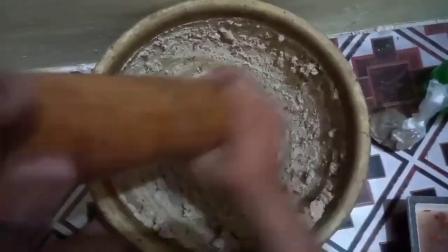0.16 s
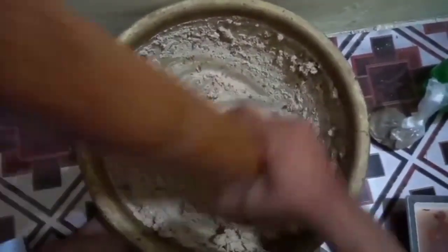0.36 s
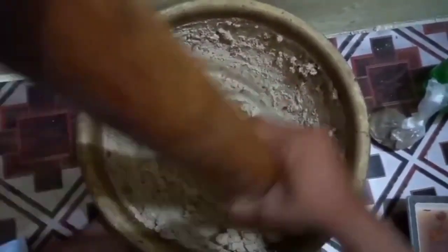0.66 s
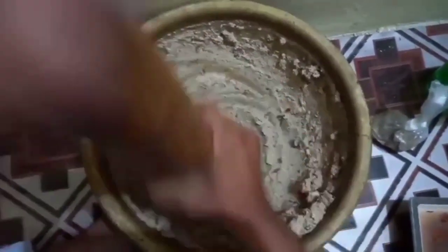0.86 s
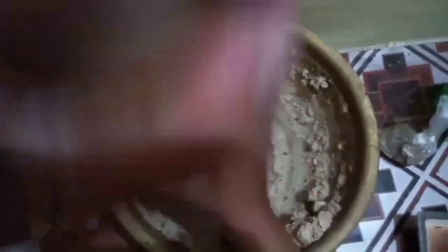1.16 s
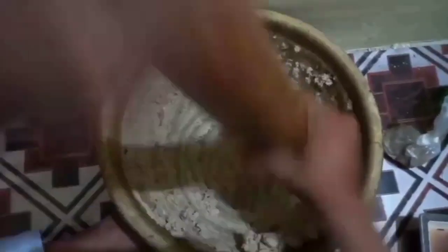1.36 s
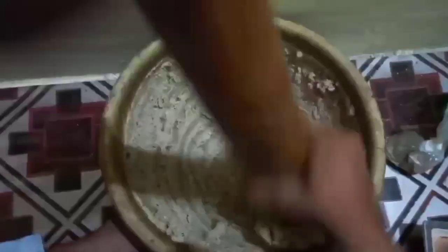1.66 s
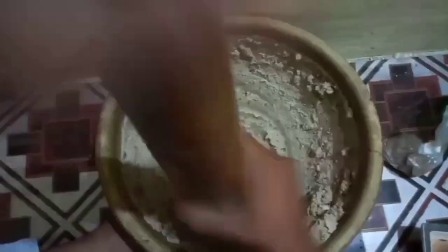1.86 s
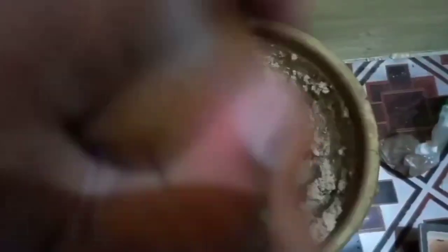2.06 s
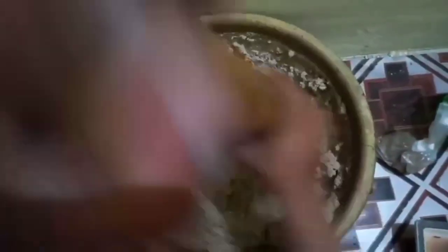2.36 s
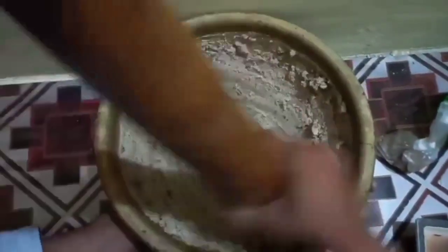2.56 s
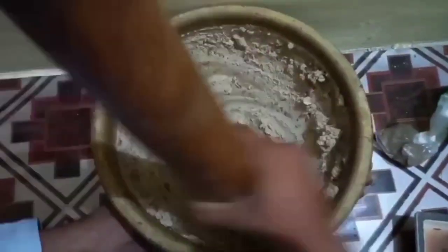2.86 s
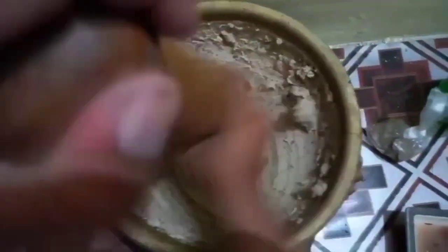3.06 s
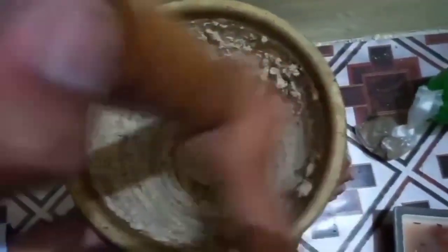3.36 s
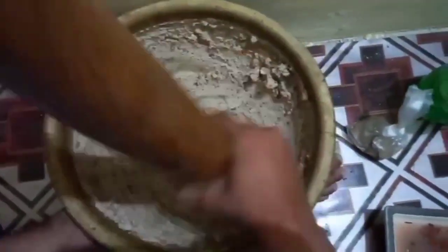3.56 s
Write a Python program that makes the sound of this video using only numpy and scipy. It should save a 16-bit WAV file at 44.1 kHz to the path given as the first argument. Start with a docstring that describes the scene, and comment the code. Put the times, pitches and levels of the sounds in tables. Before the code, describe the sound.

Rhythmic juddering rub of a wooden pestle stirring sticky, crackling paste around a glazed bowl.

```python
"""A small kitchen. Close by, a wooden pestle stirs wet paste in a glazed bowl, about three turns a second.
On each turn it bears on the wall and judders in uneven slips, with a few dull knocks; the bowl booms and
rocks on the floor. Grit scrapes and rings the wall faintly. The sticky paste crackles throughout,
squelches and now and then pops. The room answers briefly over a low background."""
import sys
import numpy as np
from scipy import signal
from scipy.fft import rfft, irfft, next_fast_len
from scipy.io import wavfile
from scipy.ndimage import uniform_filter1d, minimum_filter1d, map_coordinates

SR = 44100
rng = np.random.default_rng(int(sys.argv[2]) if len(sys.argv) > 2 else 0)


def digitize_waveform(pressure):
    """Quantize a signal to 16-bit integers and store it at the path in sys.argv[1].

    Rows of a 2-D input are taken as channels; values are limited to [-1, 1].
    """
    field = np.atleast_2d(pressure).T
    bounded = np.clip(field, -1, 1)
    quanta = np.round(bounded * 32767).astype(np.int16)
    wavfile.write(sys.argv[1], SR, quanta)


N = 163170
ATTACK_S, TOP_HZ = 0.012, 15700
STIR_START_S, STIR_END_S, EASE_DB = 0.22, 3.637, 19.5  # the hand eases off outside this span

# Spectra of the room's background and echo. Each row: frequency in Hz, gain in dB.
BACKGROUND_EQ = [(18, -45), (32, -24), (50, -8), (80, -3), (125, 10), (200, -9), (500, -19.5), (1500, -34),
                 (6000, -43), (15000, -30)]
ROOM_EQ = [(60, -14), (150, -5.5), (350, -16.5), (600, -16.5), (1000, 0), (4000, 25)]
# Room decay. Each row: frequency in Hz, T60 in seconds.
ROOM_DECAY = [(100, 0.1), (1000, 0.75), (10000, 0.12)]
# Paste activity. Each row: time in seconds, level in dB.
PASTE_LEVELS = [(0, -41.5), (.03, -33.5), (.055, -46), (.18, -38), (.205, -33.5), (.26, -36), (.33, -31.5),
                (.39, -38), (.45, -38.5), (.5, -31.5), (.68, -31), (.76, -33.5), (.95, -32), (1.15, -32.5),
                (1.29, -32.5), (1.45, -31), (1.57, -33.5), (1.83, -33.5), (1.98, -34), (2.13, -33),
                (2.28, -34), (2.7, -36.5), (2.88, -33.5), (3.02, -38), (3.21, -31.5), (3.3, -37.5),
                (3.41, -35.5), (3.54, -27), (3.6, -33.5), (3.7, -38.5)]
# Crackle position. Each row: frequency in Hz, left minus right in dB.
PASTE_PAN = [(2000, 7), (6600, -4.5), (8200, -5.5), (9800, -0.5), (10600, -6), (12200, -4), (15000, -14)]
# Bursting air pockets. Each row: start in seconds, level in dB.
POPS = [(0.865, -16), (.9335, -8.5), (1.587, -18), (1.926, -18), (2.229, -13), (2.239, -15.5), (2.278, -13),
        (2.289, -17), (2.339, -29), (2.889, -20), (3.2211, -12.5)]
# Squashed lumps. Each row: centre in seconds, spread in seconds, level in dB.
LUMPS = [(.215, 0.019, -43), (0.642, 0.097, -45), (.96, 0.12, -38.5), (2.8, 0.037, -45), (3.06, 0.036, -42),
         (3.38, .04, -45), (3.535, 0.047, -33)]
# Spectra of crackle, bubbles and grit. Each row: frequency in Hz, gain in dB.
PASTE_EQ = [(500, -1), (2000, -12.5), (4500, 0.5), (6600, -2.5), (7900, 4), (9500, 5), (10500, 2),
            (12200, 7.5), (14300, 4.5), (15600, -5.5)]
SQUELCH_EQ = [(600, -41), (1300, -2.5), (2500, 1), (4500, 9.5), (6500, 6.5), (10000, -12)]
GRIT_EQ = [(300, -1), (900, 8.5), (1300, 2.5), (1600, 0.5), (2300, 0.5), (3200, 3), (4500, -6.5),
           (6500, -9.5), (15000, -21)]
# Wall modes. Each row: frequency and width in Hz, gain in dB, delay from the hardest point of a push
# and spread in seconds.
WALL_MODES = [(1970, 34, -2, 0.029, 0.043), (1827, 140, -8.5, -0.017, 0.041), (2545, 81, -7, -0.1, 0.055),
              (2638, 37, -10, 0.013, 0.048), (3372, 83, -14.5, -0.017, 0.13),
              (3995, 113, -5.5, -0.06, 0.048)]
# Bowl modes: rubbed glaze, base on the floor, hollow, body. Each row: frequency and width in Hz, gain in dB.
RUB_MODES = [(639.4, 6.7, 5.5), (713.4, 105, 1), (822, 180, -5.5), (862, 29, -7.5), (932, 11.7, -0.5)]
BASE_MODES = [(86.3, 12, -4.5), (118.7, 42, 1), (156.2, 15, -0.5)]
HOLLOW_MODES = [(216, 13, -3.5), (233.8, 12.4, 4), (287.5, 9.6, -1.5), (327.7, 19, -3.5)]
BODY_MODES = [(221, 23, -18.5), (289.4, 7.6, 0.5), (350.4, 8.7, -6), (385.6, 45, -7.5), (449, 29.4, 4),
              (495.4, 14, 0)]
# Spectral shapes over those modes. Each row: frequency in Hz, gain in dB.
RUB_EQ = [(100, -30), (500, 0), (620, 3), (980, 1.5), (1150, -25.5), (2500, 13), (6000, -33)]
BASE_EQ = [(18, -35), (32, -17), (50, 3), (170, 0), (260, -13), (600, -15), (3000, -47)]
HOLLOW_EQ = [(60, -18), (170, -20), (205, 2.5), (350, -2.5), (600, -7.5), (3000, -65)]
BODY_EQ = [(60, -22), (200, -18), (350, 11), (520, 1), (590, -15), (900, -10), (1500, -17), (6000, -50)]
# One push per turn. Each row: start and hardest point in seconds, then levels in dB of judder, boom,
# scrape, rub and wall ring.
PUSHES = [(0.044, 0.034, -29.5, -54, -38.5, -43.5, -54), (0.293, 0.384, -19, -24, -32, -35, -38.5),
          (0.537, 0.598, -20.5, -24, -44, -31, -40), (0.67, 0.73, -28, -23, -31.5, -33.5, -36),
          (0.899, 0.982, -19, -21.5, -29.5, -28.5, -36), (1.184, 1.31, -15, -20, -30.5, -29.5, -30.5),
          (1.487, 1.649, -17, -19.5, -28, -26.5, -30.5), (1.816, 1.97, -17, -14.5, -39, -29, -33.5),
          (2.158, 2.293, -13, -17, -38, -30, -33.5), (2.468, 2.629, -13, -17, -37, -31.5, -33.5),
          (2.815, 2.896, -17, -17.5, -35.5, -31, -39), (3.168, 3.248, -11.5, -14.5, -35, -26.5, -36.5),
          (3.492, 3.51, -16.5, -25.5, -43, -28, -40.5)]
_, HARDEST_S, JUDDER_DB, BOOM_DB, SCRAPE_DB, RUB_DB, WALL_DB = zip(*PUSHES)
# Pestle catching on the wall. Each row: start in seconds, peak in dB, pitch in Hz, T60 in seconds.
KNOCKS = [(.369, -2, 433, .02), (.383, -8, 400, 0.019), (.545, -3, 430, .035), (.559, -9, 445, 0.036),
          (.714, -11, 420, .03), (0.934, -5, 446, 0.048), (.949, -10, 442, 0.044), (1.196, -9, 463, .03),
          (1.268, -7, 430, .06), (1.502, -6, 430, 0.043), (1.514, -7, 432, 0.062), (1.62, -8, 426, 0.045),
          (1.839, -5.5, 454, 0.043), (1.968, -8.5, 442, 0.07), (2.195, -18.5, 695, 0.041),
          (2.24, -8, 350, 0.011), (2.276, -2, 442, 0.048), (2.601, -6.5, 426, 0.035),
          (2.855, -12, 420, 0.033), (3.185, -23.5, 713, 0.11), (3.192, -8, 380, 0.027),
          (3.204, -6, 396, 0.026), (3.214, -6, 440, 0.04), (3.24, -5.5, 398, 0.0097),
          (3.257, -8, 367, 0.032), (3.509, -6.5, 423, 0.061)]


def amp(db):
    """Decibels to gain."""
    return 10 ** (np.asarray(db) / 20)


def unit(x):
    """Scale to rms 1."""
    return x / np.sqrt(np.mean(x ** 2) + 1e-20)


def along(points, hz):
    """Interpolate (Hz, value) points on a log axis."""
    f, v = np.transpose(points)
    return np.interp(np.log(hz + 1), np.log(f + 1), v)


def wobble(knots_per_s):
    """Smooth random curve."""
    return map_coordinates(rng.standard_normal(4000), [np.arange(N) * knots_per_s / SR], mode="mirror")


def hump(centre_s, spread_s):
    """Gaussian swell, peak 1."""
    return np.exp(-.5 * ((np.arange(N) / SR - centre_s) / spread_s) ** 2)


def filtered(x, response):
    """Apply a complex frequency response."""
    m = next_fast_len(N + SR // 2)
    return irfft(rfft(x, m) * response(np.fft.rfftfreq(m, 1 / SR)), m)[..., :N]


def eq(x, points):
    """Apply a (Hz, dB) curve."""
    return filtered(x, lambda f: amp(along(points, f)))


def ring(x, modes):
    """Parallel resonators: (Hz, width in Hz, dB)."""
    return filtered(x, lambda f: sum(amp(db) * 1j * f * width / (hz * hz - f * f + 1j * f * width)
                                     for hz, width, db in modes))


def stereo(make, shared):
    """Pair from one common and two separate draws; shared is a power fraction."""
    return np.sqrt(shared) * make() + np.sqrt(1 - shared) * np.array([make(), make()])


def patchy(x, depth_db, bins, frames):
    """Clumps: random level across bands and moments."""
    z = signal.stft(x, nperseg=256)[2]
    field = uniform_filter1d(rng.standard_normal(z.shape[1:]), bins, 0)
    field = unit(uniform_filter1d(field, frames, 1))
    return signal.istft(z * amp(depth_db * np.clip(field, -2.2, 2.2)), nperseg=256)[1][:, :N]


def grains(per_s, spread_db):
    """Clicks of random time, size and sign."""
    chance, size = rng.random(N), rng.standard_normal(N)
    return unit((chance < per_s / SR) * amp(spread_db * np.clip(size, -2.5, 2.5)) * rng.choice([-1, 1], N))


def slips(per_s, uneven, spread_db):
    """Stick-slip: one-sided jerks at an uneven rate."""
    gap, size = rng.standard_normal((3000, 2)).T
    at = (np.cumsum(np.exp(uneven * gap)) * SR / per_s).astype(int)
    return unit(np.bincount(at[at < N], amp(spread_db * np.clip(size, -2, 1.5))[at < N], N))


def effort(levels_db, idle_db, swell_db, release_db_per_s, delay_s):
    """Each push bites, swells to its hardest point and lets go, over steady sliding."""
    t = np.arange(N) / SR - delay_s
    span_s = [STIR_START_S - ATTACK_S, STIR_START_S, STIR_END_S, STIR_END_S + 4 * ATTACK_S]
    power = amp(idle_db + np.interp(t, span_s, [-EASE_DB, 0, 0, -EASE_DB])) ** 2
    for (start_s, hardest_s, *_), db in zip(PUSHES, levels_db):
        bite = np.clip((t - start_s) / ATTACK_S + .5, 0, 1)
        rise_db = np.interp(t, [start_s, hardest_s], [-swell_db, 0])
        fall_db = release_db_per_s * np.maximum(t - hardest_s, 0)
        power += (bite * amp(db + rise_db - fall_db)) ** 2
    return np.sqrt(power)


def background(rms_db=-33.5):
    """Steady low room noise."""
    noise = stereo(lambda: rng.standard_normal(N), shared=0.93)
    return unit(eq(noise, BACKGROUND_EQ)) * amp(rms_db)


def kitchen(x):
    """Short room echo, different at each ear."""
    hz, t, z = signal.stft(rng.standard_normal((2, SR // 2)), SR, nperseg=256)
    tail = signal.istft(z * amp(-60 * t / along(ROOM_DECAY, hz)[:, None]), SR, nperseg=256)[1]
    echo = signal.fftconvolve(x[None], tail / np.linalg.norm(tail[0]), axes=1)
    return eq(echo[:, :N], ROOM_EQ)


def paste(fizz_db=-1.5, smack_db=-8, pop_db=3, pop_s=0.00067):
    """Sticky paste tears: fine crackle, sparser smacks, popping air pockets."""
    t = np.arange(N) / SR
    smacks = stereo(lambda: grains(per_s=260, spread_db=4), shared=.1) * amp(smack_db + 3 * wobble(12))
    fizz = stereo(lambda: grains(per_s=12000, spread_db=1.5), shared=.04)
    fizz *= amp(fizz_db + 1.8 * wobble(250))
    tearing = eq(patchy(fizz + smacks, depth_db=2.12, bins=14, frames=10), PASTE_EQ)
    tearing /= eq(unit(fizz), PASTE_EQ).std()
    tearing *= amp(np.interp(t, *np.transpose(PASTE_LEVELS)) + 0.78 * wobble(29.65))
    bursts = sum(amp(db + pop_db) * (t >= s) * np.exp(-np.abs(t - s) / pop_s) for s, db in POPS)
    pops = eq(.5 * bursts * rng.standard_normal((2, N)), PASTE_EQ)
    return filtered(tearing + pops, lambda f: amp(along(PASTE_PAN, f) * np.array([[.5], [-.5]])))


def squelch(count=9000, median_hz=3400, scatter=0.51, cycles_per_20_db=6, spread_db=3, trim_db=-10):
    """Small bubbles part, each a brief ring at its own pitch; louder where a lump is squashed."""
    at, t = rng.integers(0, N, count), np.arange(200) / SR
    pitch, size, side = rng.standard_normal((count, 3)).T
    hz = np.clip(median_hz * np.exp(scatter * pitch), 700, 9000)[:, None]
    rings = np.sin(2 * np.pi * hz * t) * amp(-20 * hz * t / cycles_per_20_db)
    rings *= amp(spread_db * np.clip(size, -2, 2))[:, None]
    index = (at[:, None] + np.arange(len(t))).ravel()
    pans = np.cos(side + np.pi / 4), np.sin(side + np.pi / 4)
    bubbles = np.array([np.bincount(index, (rings * pan[:, None]).ravel(), N)[:N] for pan in pans])
    bubbles = eq(patchy(bubbles, depth_db=3, bins=8, frames=8), SQUELCH_EQ)
    stirring = amp(np.interp(np.arange(N) / SR, *np.transpose(PASTE_LEVELS)) + trim_db)
    lumps = sum(amp(db) * hump(s, spread_s) for s, spread_s, db in LUMPS)
    return unit(bubbles) * np.hypot(stirring, lumps)


def wall():
    """Grit rings each wall mode as the pestle passes its point of the turn."""
    out = 0
    for hz, width_hz, mode_db, delay_s, spread_s in WALL_MODES:
        passing = sum(amp(db + mode_db) * hump(s + delay_s, spread_s) for s, db in zip(HARDEST_S, WALL_DB))
        grit = stereo(lambda: grains(per_s=2300, spread_db=9), shared=0.067)
        mode = ring(grit, [(hz, width_hz, 0)])
        out += passing * unit(ring(mode, [(hz, 6 * width_hz, 0)]))  # steeper skirts
    return out


def scrape(trim_db=-2.5):
    """Grit drags under the pestle in soft clumps."""
    push = effort(SCRAPE_DB, idle_db=-37, swell_db=3, release_db_per_s=115, delay_s=0.011)
    grit = stereo(lambda: grains(per_s=5100, spread_db=3.5), shared=0.16)
    clumps = patchy(grit, depth_db=4, bins=6, frames=7)
    return unit(eq(clumps, GRIT_EQ)) * push * amp(trim_db + 2.7 * wobble(63))


def rub():
    """The pestle's face rubs the glaze through each push."""
    push = effort(RUB_DB, idle_db=-48.5, swell_db=4, release_db_per_s=115, delay_s=0)
    jerks = stereo(lambda: slips(per_s=360, uneven=.7, spread_db=6), shared=0.71)
    return unit(eq(ring(jerks, RUB_MODES), RUB_EQ)) * push


def rumble(push_db=-24.5):
    """The heavy bowl rocks on the floor just behind each push."""
    jerks = slips(per_s=260, uneven=.6, spread_db=1)
    push = effort([push_db] * len(PUSHES), idle_db=-34.5, swell_db=3.5, release_db_per_s=84, delay_s=0.011)
    return unit(eq(ring(jerks, BASE_MODES), BASE_EQ)) * push


def boom():
    """The bowl's hollow booms late in each push and lingers."""
    jerks = slips(per_s=240, uneven=.5, spread_db=3)
    push = effort(BOOM_DB, idle_db=-37.5, swell_db=9, release_db_per_s=90, delay_s=0.012)
    return unit(eq(ring(jerks, HOLLOW_MODES), HOLLOW_EQ)) * push


def knocks(rise_share=0.093):
    """Hard catches, cushioned by paste: a few cycles of one resonance build and die."""
    out, t = np.zeros(N + SR), np.arange(SR // 5) / SR
    for start_s, db, hz, t60_s in KNOCKS:
        rise = 1 - np.exp(-(t / (rise_share * t60_s)) ** 2)
        shape = rise * amp(-60 * t / t60_s)
        out[round(start_s * SR):][:len(t)] += amp(db) * shape / shape.max() * np.sin(2 * np.pi * hz * t)
    return out[:N]


def judder():
    """The pestle slips along the wall and shakes the bowl's body."""
    jerks = slips(per_s=170, uneven=.6, spread_db=1)
    push = effort(JUDDER_DB, idle_db=-32.5, swell_db=5.5, release_db_per_s=209, delay_s=-0.011)
    body = lambda x: eq(ring(x, BODY_MODES), BODY_EQ)
    return body(jerks * push) / body(jerks).std()


def scene():
    """Bowl, grit and paste over the room's background."""
    leftward = np.array([[1], [-1]])
    bowl = judder() + boom() + rumble() + knocks()
    room_noise = background()
    gritty = (scrape() + wall() + squelch()) * amp(-0.9 * leftward)
    return bowl * amp(0.23 * leftward) + kitchen(bowl) + rub() + gritty + paste() + room_noise


def record(dry):
    """Fast limiter at full scale, then a brick-wall low-pass."""
    needed = 1 / np.maximum(np.abs(dry).max(axis=0), 1)
    gain = uniform_filter1d(minimum_filter1d(needed, size=400), size=400)
    return filtered(dry * gain, lambda hz: hz < TOP_HZ)


dry = scene()
out = record(dry)
digitize_waveform(out)
```